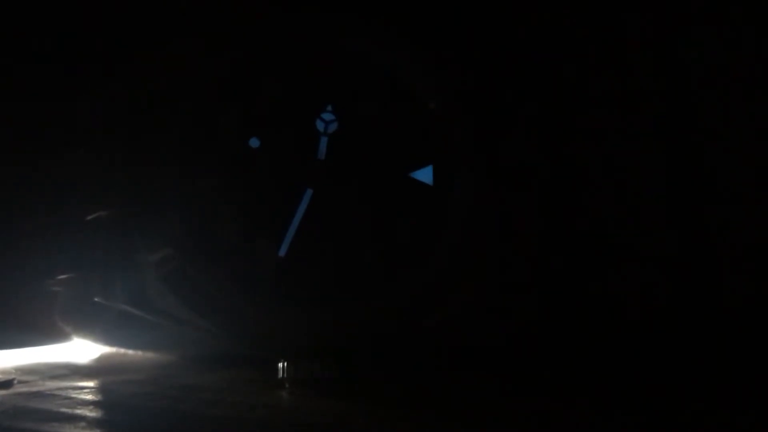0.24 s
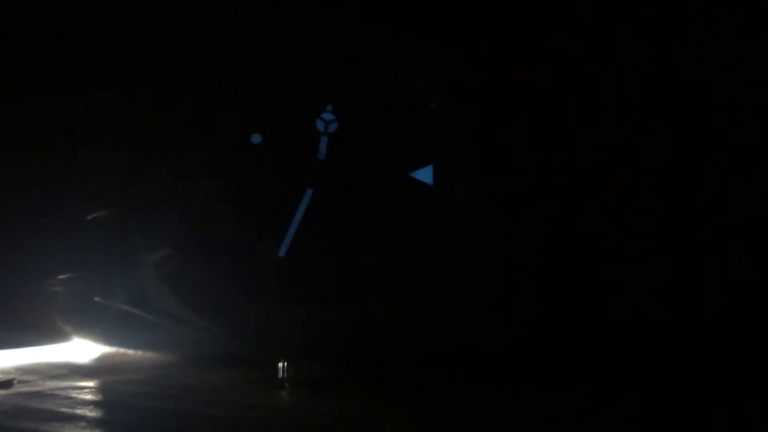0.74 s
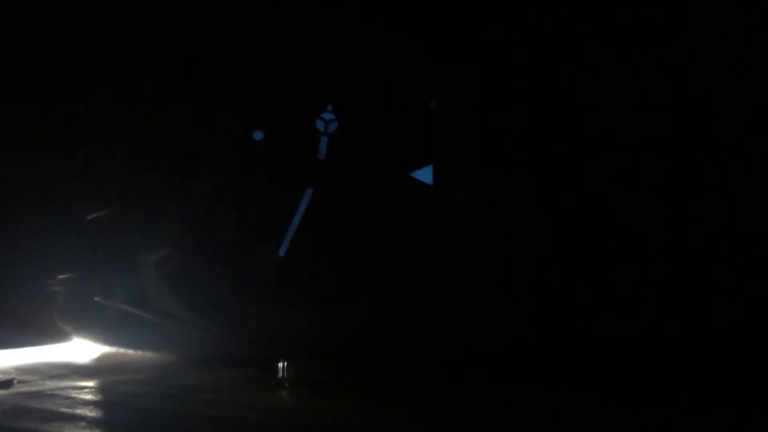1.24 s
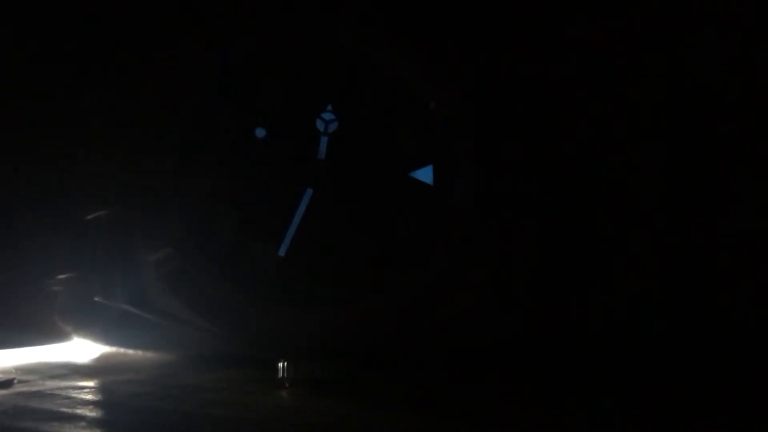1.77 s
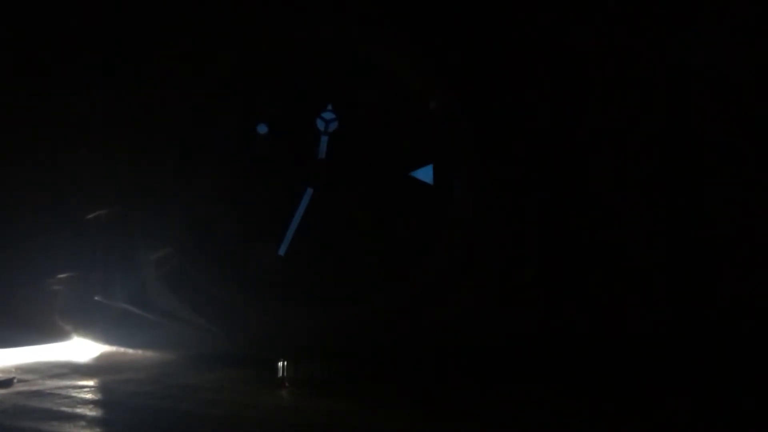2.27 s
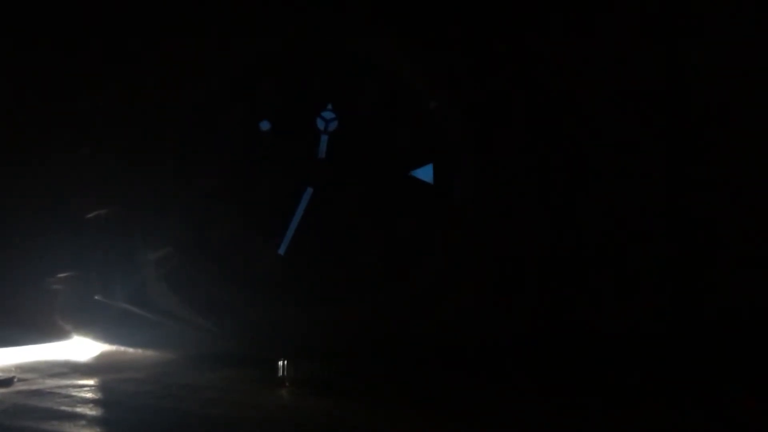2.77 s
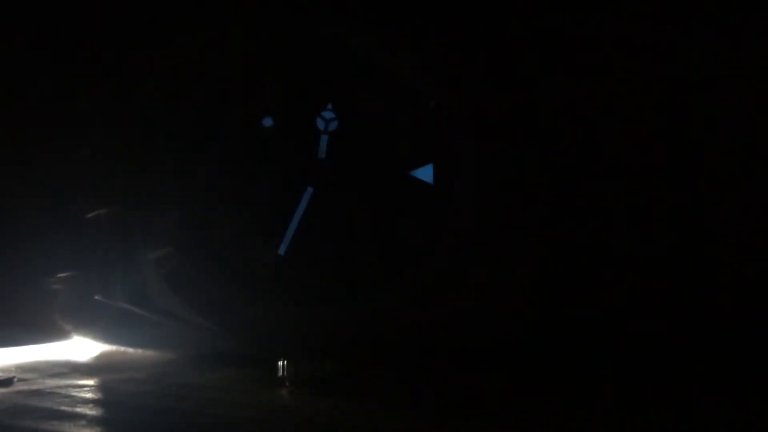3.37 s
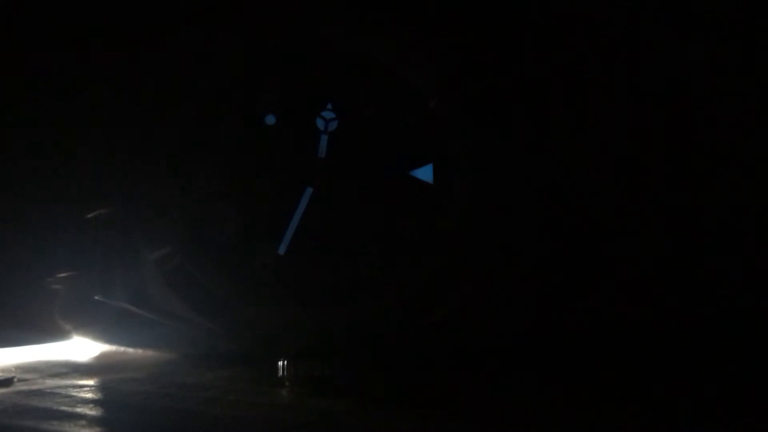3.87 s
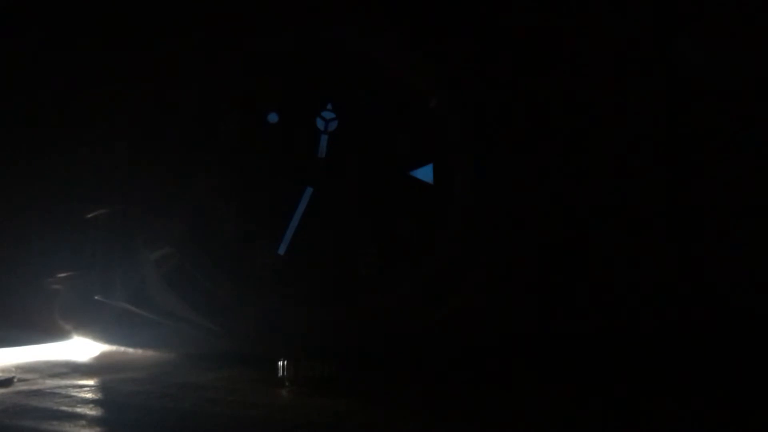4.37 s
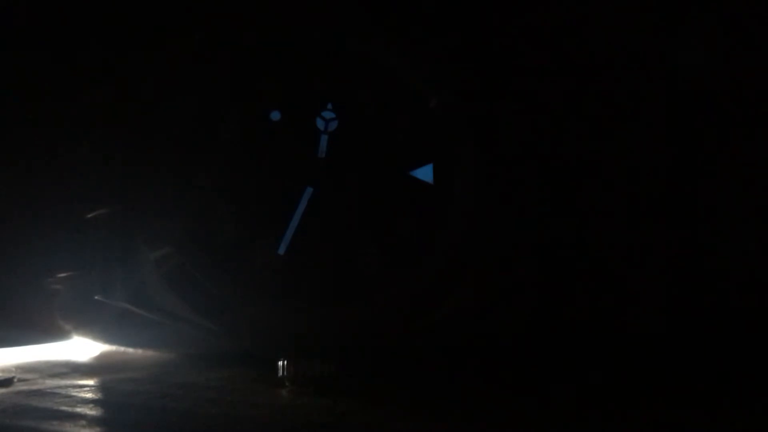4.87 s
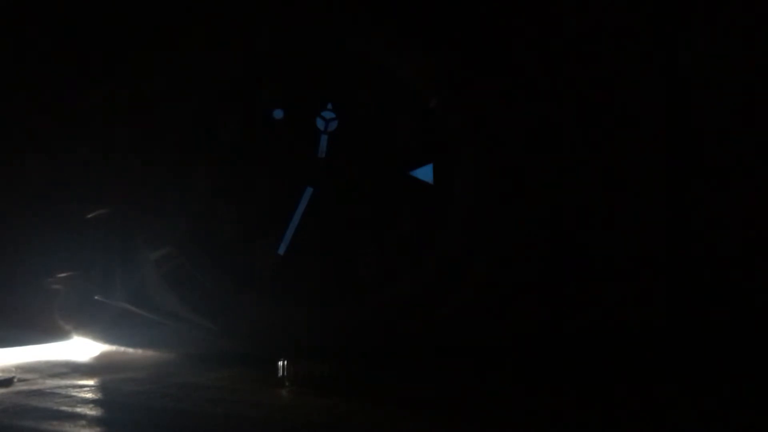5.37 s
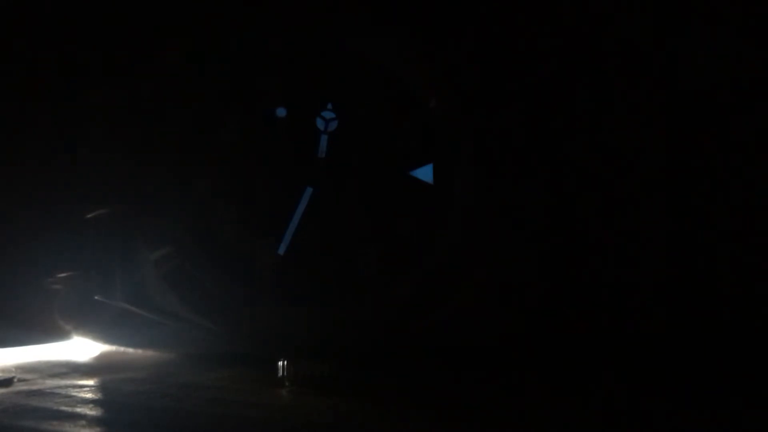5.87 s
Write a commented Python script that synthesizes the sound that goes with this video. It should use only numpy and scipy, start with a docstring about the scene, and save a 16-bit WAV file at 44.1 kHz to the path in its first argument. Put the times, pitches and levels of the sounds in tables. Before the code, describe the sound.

Close handling of a softly ticking mechanical watch: small creaks, dull bumps and a hard triple-catch click over a wavering low machine hum.

```python
"""Wristwatch in the hand

A mechanical watch ticks faintly six times a second, close by: brief contacts ring its small metal parts.
The grip creaks (snap, bright edge, thump) and the hand bumps the body in short low swings.
A finger brushes the casing as ringing, rasping noise, then slips with a sharp click of three quick catches;
a nail ticks thinly. Behind lie a motor hum built from multiples of its throb, a faint bearing and room air."""
import sys
import numpy as np
from scipy import signal
from scipy.fft import rfft, irfft
from scipy.io import wavfile

SR = 44100
rng = np.random.default_rng(int(sys.argv[2]) if len(sys.argv) > 2 else 0)


def dump_mix(stems):
    """Bounce the given channels to the path in sys.argv[1] as a 16-bit WAV at rate SR."""
    frames = np.atleast_2d(stems).T  # one column per channel
    limited = np.clip(frames, -1, 1)  # hard clip at full scale
    pcm = np.round(limited * 32767).astype(np.int16)
    wavfile.write(sys.argv[1], SR, pcm)


N = 270333
TIME = np.arange(N) / SR   # seconds

# Unlocking, impulse and drop in one beat of the escapement.
# Each row: offset from the beat in seconds, level in dB relative to the drop.
BEAT_CONTACTS = [(-.0113, -12), (-.0062, -8), (0, 0)]
FIRST_BEAT_S, BEATS_PER_S = .1556, 6
# Resonances of the watch case. Each row: frequency in Hz, width in Hz, relative level in dB.
WATCH_MODES = [(7330, 190, 3.5), (8600, 660, -8), (11300, 400, 2.5), (12400, 1000, -26), (12400, 620, 2.5),
               (15400, 900, 5.5)]

# Finger strokes on the casing. Each row: start in seconds, attack in seconds, hold in seconds,
# release to -60 dB in seconds, stroke level in dB, rasp in dB relative to the stroke,
# frequency in Hz above which the rasp dulls.
STROKES = [(1.761, 0.095, 0.043, 0.078, -46, 2, 5000), (2.266, 0.018, 0.15, 0.24, -50, 0, 9000),
           (2.308, 0.0097, 0.0069, 0.12, -22.5, -2.5, 18000)]
# Resonances of the casing. Each row: frequency in Hz, width in Hz, relative level in dB.
CASING_MODES = [(179, 31, 1.5), (287, 45, 4), (340, 44, -6.5), (439, 54, -1.5), (573, 22, -3.5),
                (675, 51, 2), (754, 84, -4.5), (822, 45, -5), (995, 50, -21), (1680, 73, -6),
                (1905, 36, -7.5), (2634, 90, -14.5), (2850, 90, -10), (3190, 90, -18.5), (4130, 130, -18),
                (4550, 185, -15.5), (4720, 200, -23), (5020, 80, -20.5), (5970, 150, -40), (8250, 360, -33)]
# Colour of skin rasping on the casing. Each row: frequency in Hz, relative density in dB per Hz.
RASP_COLOUR = [(150, 10.5), (500, 8.5), (1000, 1.5), (2000, -11.5), (3500, -17), (6000, -17.5),
               (10000, -20.5), (16000, -19)]
# In the hardest stroke the finger catches several times in a row, each time harder.
FIRST_CATCH_S, CATCH_GAP_S = 2.3174, .006
CATCH_DB, CATCH_GROWTH_DB = -24, 3.5
# Fingernail ticks on the casing. Each row: time in seconds, level of the contact in dB before filtering.
NAIL_TICKS = [(0.2304, -45.5), (1.8291, -41), (4.9854, -48)]

# Creaks of the grip. Each row: time in seconds, snap level in dB before a common trim,
# thump envelope peak in dB, thump pitch in Hz.
CREAKS = [(0.1856, -49, -37.5, 236), (0.4621, -43, -32, 222), (.5328, -43, -34, 214),
          (0.5713, -36, -38.5, 227), (0.606, -36, -32.5, 210), (0.672, -37, -33.5, 192),
          (0.7005, -37.5, -40, 200), (1.243, -37.5, -33, 195), (1.485, -35, -32.5, 160),
          (1.516, -37, -36, 158), (1.718, -33.5, -36.5, 195), (1.7655, -35, -33.5, 174),
          (1.828, -33, -40, 171), (1.883, -32, -35, 165), (3.3389, -41, -36.5, 220),
          (3.5959, -41.5, -36, 228), (3.635, -37, -38, 336), (4.148, -32.5, -36, 319),
          (4.6703, -32, -32.5, 227), (6.0107, -30, -29, 227)]
# Resonances of a snap. Each row: multiple of the snap's pitch, width in Hz, relative level in dB.
SNAP_MODES = [(.52, 595, -8.5), (.84, 280, 0.5), (1, 198, 4), (1.8, 494, -7.5), (2.4, 700, -10.5)]
SNAP_HZ = 1763   # central pitch of the snaps
# A creak listed at CREAK_DB has an edge at EDGE_DB; harder creaks are much brighter.
CREAK_DB, EDGE_DB = -37.5, -64.5
EDGE_GROWTH = 2.4   # dB of edge per dB of snap
# Dull knock of the body. Each row: frequency in Hz, width in Hz, relative level in dB.
KNOCK_MODES = [(205, 50, 0), (335, 50, -2), (560, 160, -15)]

# Soft bumps of the hand. Each row: time in seconds, envelope peak in dB, pitch in Hz.
BUMPS = [(.396, -35, 208), (1.145, -36.5, 220), (2.104, -34, 200), (2.297, -26.5, 158),
         (2.3487, -17, 182.5), (2.772, -34, 240), (3.024, -37.5, 233), (3.178, -33.5, 232),
         (4.574, -34, 231), (4.986, -31.5, 333), (5.2869, -24.5, 128)]
# Fainter bumps at chance times as the hand fidgets; pitch varies about FIDGET_HZ.
FIDGETS_PER_S, FIDGET_DB, FIDGET_HZ = .7, -39, 228

# Partials of the motor hum. Each row: multiple of the throb rate, relative level in dB before wavering.
HUM_PARTIALS = [(3, -14), (6, -7), (7, -0.5), (8, -7.5), (9, -38), (10, -30), (11, -28), (13, -31)]
# Throb of the motor. Each row: time in seconds, rate in pulses per second.
THROB_RATE = [(0, 17.5), (1.1, 17.62), (1.8, 17.43), (2.25, 17.68), (2.8, 17.38), (3.25, 17.38),
              (4.1, 18.08), (4.7, 17.38), (5.4, 18.07), (6.13, 17.55)]
# Swell of the hum. Each row: time in seconds, level in dB before a small trim.
HUM_LEVEL = [(0, -54), (.65, -44), (1.5, -47), (1.97, -52.5), (2.2, -43), (2.55, -51), (3.05, -47),
             (3.35, -44), (4.15, -40.5), (4.65, -51.5), (4.9, -45), (5.4, -41), (6.13, -46.5)]
# Singing of a dry bearing. Each row: frequency in Hz, width in Hz, relative level in dB.
BEARING_MODES = [(749, 32, -10.5), (1136, 18, 6.5), (1291, 47, -3.5), (1680, 135, -10.5)]
BEARING_TURNS_PER_S, FIRST_RUB_S = 5.831, .156

# Tones in the room. Each row: frequency in Hz before wander, rms level in dB before wavering,
# spread of the wavering in dB.
ROOM_TONES = [(44.3, -61.5, 6), (70.66, -52, 2.5), (232.8, -64.5, 5), (254.6, -61.5, 2),
              (728.6, -70.5, 0.5)]
# Colour of the room air. Each row: frequency in Hz, relative density in dB per Hz.
AIR_COLOUR = [(33, -12), (46, 1.5), (90, 1), (170, 2), (290, -12), (360, -9), (470, -15), (700, -18.5),
              (1300, -21), (1420, -26.5), (1850, -25.5), (2450, -34.5), (3200, -33), (4300, -35)]
# Colour of the thin hiss. Each row: frequency in Hz, relative density in dB per Hz.
HISS_COLOUR = [(4500, 1.5), (6300, 5), (7600, -1), (8400, 2.5), (9700, 0.5), (10400, -4), (11200, -2),
               (12400, 3.5), (14000, -1), (16000, 3)]
AIR_DB, HISS_DB = -46, -76   # rms

MIC_LOW_CUT_HZ, CUTOFF_HZ = 28, 15900


def watch(level_db=-60, tock_lag_s=.001, tock_db=0.5, uneven_db=1.6, decay_s=0.0016):
    """Three contacts a beat ring the case; every other beat comes a touch late and is set louder."""
    beat = np.arange(int(N / SR * BEATS_PER_S))
    is_tock = beat % 2
    times = FIRST_BEAT_S + beat / BEATS_PER_S + tock_lag_s * is_tock
    offset, contact_db = np.transpose(BEAT_CONTACTS)
    unevenness = uneven_db * rng.standard_normal((len(beat), 1))
    levels = level_db + contact_db + tock_db * is_tock[:, None] + unevenness
    contacts = bursts((times[:, None] + offset).ravel(), levels.ravel(), decay_s)
    return resonate(contacts, WATCH_MODES)


def slide(start, attack, hold, release, level_db, rasp_db, dull_hz, grain_db=3.0):
    """Skin sticks and slips: uneven friction rasps and sets the casing ringing."""
    t = TIME - start
    rise = np.clip(t / attack, 0, 1)
    fall = 1000.0 ** (-np.clip((t - attack - hold) / release, 0, 2))
    grain = rms_one(from_db(grain_db * np.clip(drift(190), -2, 2)))
    force = rise * fall * grain
    ringing = resonate(force * rng.standard_normal(N), CASING_MODES)
    # one-pole low-pass on the rasp
    dull = np.exp(-2 * np.pi * dull_hz / SR)
    rasp = signal.lfilter([1 - dull], [1, -dull], force * noise(RASP_COLOUR))
    return from_db(level_db) * (ringing + from_db(rasp_db) * rasp)


def catches(ring_db=2.0, rasp_db=-19.0, decay_s=0.0019, push_db=-4.5, push_hz=338, push_lag_s=0.00423, count=3):
    """Each catch lets go with a sharp crack that rings through the casing and pushes the body."""
    k = np.arange(count)
    times = FIRST_CATCH_S + CATCH_GAP_S * k
    levels = CATCH_DB + CATCH_GROWTH_DB * k
    cracks = bursts(times, levels, decay_s)
    ringing = from_db(ring_db) * resonate(cracks, CASING_MODES)
    rasp = from_db(rasp_db) * np.abs(cracks) * noise(RASP_COLOUR)
    push_rows = zip(times + push_lag_s, levels + push_db, np.full(count, push_hz))
    return ringing + rasp + thumps(push_rows, rise_s=0.0035, decay_s=0.0069)


def nail(decay_s=.0015, ring_db=-2.5, lowest_hz=2200):
    """The nail touches lightly: a thin, bright tick that wakes only the high modes of the casing."""
    times, levels = np.transpose(NAIL_TICKS)
    high_modes = [mode for mode in CASING_MODES if mode[0] > lowest_hz]
    ring = resonate(bursts(times, levels + ring_db, decay_s), high_modes)
    return bright_edges(times, levels, decay_s) + ring


def grip(knock_db=1.0, edge_s=0.0019, knock_s=0.0042, lag_s=0.00084):
    """A creak is a short snap with a bright edge and a knock, followed by the thump of the whole body."""
    times, snap_db, thump_db, thump_hz = np.transpose(CREAKS)
    edges = bright_edges(times, EDGE_DB + EDGE_GROWTH * (snap_db - CREAK_DB), edge_s)
    body = thumps(zip(times + lag_s, thump_db, thump_hz), rise_s=0.002, decay_s=0.009)
    return snaps() + edges + knocks(times, thump_db + knock_db, knock_s) + body


def snaps(level_db=-5.0, crunch=0.14, decay_s=0.0009, spread_octaves=0.046):
    """Each creak lets go with one slip and a little crunch, ringing briefly at nearly the same pitch."""
    out, t = np.zeros(N), TIME[:SR // 20]
    for start, snap_db, _, _ in CREAKS:
        hz = SNAP_HZ * 2 ** (spread_octaves * rng.standard_normal())
        force = crunch * rng.standard_normal(len(t)) * np.exp(-t / decay_s)
        force[SR // 1000] += 1   # the slip, 1 ms into the crunch
        # skin cushions the contact, so little is excited far above the pitch
        cushion = signal.butter(2, 1.5 * hz, fs=SR, output="sos")
        modes = [(ratio * hz, width, mode_db) for ratio, width, mode_db in SNAP_MODES]
        ring = resonate(signal.sosfilt(cushion, force), modes)
        add(out, start, from_db(snap_db + level_db) * ring / np.abs(ring).max())
    return out


def hand(knock_db=-7.0, knock_s=0.006, spread_octaves=.15):
    """The hand bumps the body with a dull knock, and fidgets faintly at chance times."""
    times, levels, _ = np.transpose(BUMPS)
    chance = rng.uniform(-1, 1, (round(FIDGETS_PER_S * N / SR), 2))
    fidgets = [(TIME[-1] * (1 + when) / 2, FIDGET_DB, FIDGET_HZ * 2 ** (spread_octaves * pitch))
               for when, pitch in chance]
    pushes = thumps(list(BUMPS) + fidgets, rise_s=0.0027, decay_s=0.0062)
    return knocks(times, levels + knock_db, knock_s) + pushes


def motor(waver_db=1.5, level_db=0.37, smear=0.58):
    """Neighbouring multiples of the throb rate swell roughly in step and beat into a low flutter."""
    angle = 2 * np.pi * (np.cumsum(in_time(THROB_RATE)) / SR + rng.random())
    hum = 0
    for order, db in HUM_PARTIALS:
        phase = smear * rng.uniform(-0.87, 1)   # radians
        hum = hum + from_db(db + waver_db * drift(2.5)) * np.sin(round(order) * angle + phase)
    return np.sqrt(2) * from_db(in_time(HUM_LEVEL) + level_db) * hum


def bearing(level_db=-66.5, rub_db=4.5):
    """Once a turn the bearing rubs a little harder; the friction noise makes it sing faintly."""
    turn = np.cos(2 * np.pi * BEARING_TURNS_PER_S * (TIME - FIRST_RUB_S))
    friction = rms_one(from_db(rub_db * turn)) * rng.standard_normal(N)
    return from_db(level_db) * resonate(friction, BEARING_MODES)


def room(wander=0.002):
    """Moving air, thin hiss and a few faint tones that waver in pitch and level."""
    out = from_db(AIR_DB) * noise(AIR_COLOUR) + from_db(HISS_DB) * noise(HISS_COLOUR)
    for hz, db, waver_db in ROOM_TONES:
        angle = 2 * np.pi * np.cumsum(hz * (1 + wander * drift(5.3))) / SR
        out = out + np.sqrt(2) * from_db(db + waver_db * drift(2.8)) * np.sin(angle)
    return out


def bursts(times, levels_db, decay_s):
    """Brief contacts: each starts at once and dies away as a tiny crunch of random signs."""
    starts = np.zeros(N)
    at = np.clip(np.round(np.asarray(times) * SR).astype(int), 0, N - 1)
    starts[at] = from_db(levels_db)
    envelope = signal.lfilter([1], [1, -np.exp(-1 / (decay_s * SR))], starts + 1e-18)
    return envelope * rng.choice([-1, 1], N)


def thumps(rows, rise_s, decay_s):
    """Cushioned pushes, each a short swing; rows hold seconds, envelope peak in dB and Hz."""
    out, t = np.zeros(N), TIME[:SR // 10]
    envelope = (1 - np.exp(-t / rise_s)) * np.exp(-t / decay_s)
    envelope = envelope / envelope.max()
    for start, db, hz in rows:
        add(out, start, -from_db(db) * envelope * np.sin(2 * np.pi * hz * t))
    return out


def knocks(times, levels_db, decay_s, dull_hz=1100):
    """Skin cushions a knock on the body, so it has little treble."""
    cushion = signal.butter(2, dull_hz, fs=SR, output="sos")
    return signal.sosfilt(cushion, resonate(bursts(times, levels_db, decay_s), KNOCK_MODES))


def bright_edges(times, levels_db, decay_s, low_hz=2700, high_hz=12500):
    """The treble crack of a contact: its crunch through a gentle band-pass."""
    band = signal.butter(1, [low_hz, high_hz], "band", fs=SR, output="sos")
    return signal.sosfilt(band, bursts(times, levels_db, decay_s))


def resonate(force, modes):
    """Parallel resonances, scaled so that white noise roughly keeps its power."""
    out, power = 0, 0
    for k, (hz, width, db) in enumerate(modes):
        r = np.exp(-np.pi * width / SR)
        poles = [1, -2 * r * np.cos(2 * np.pi * hz / SR), r * r]
        scale = (1 - r * r) / 2
        ring = signal.lfilter([1, 0, -1], poles, force + 1e-18)
        out = out + (-1) ** k * from_db(db) * scale * ring   # neighbours have opposite signs
        power += from_db(db) ** 2 * scale
    return out / np.sqrt(power)


def noise(spectrum):
    """Steady noise of the given colour, falling away beyond its ends; rms 1."""
    hz, db = np.transpose(spectrum)
    f = np.maximum(np.arange(N // 2 + 1) * SR / N, 1)
    skirts = 1 / (1 + (hz[0] / f) ** 16 + (f / hz[-1]) ** 16)
    gain = from_db(np.interp(np.log(f), np.log(hz), db)) * np.sqrt(skirts)
    return rms_one(irfft(rfft(rng.standard_normal(N)) * gain, N))


def drift(rate):
    """Random wandering of about the given rate in Hz, scaled to rms 1."""
    # drawn once every 100 samples, after a run-in of 1000 values
    r = np.exp(-200 * np.pi * rate / SR)
    white = rng.standard_normal(N // 100 + 1002)
    slow = signal.lfilter([1], [1, -2 * r, r * r], white)[1000:]
    return np.interp(np.arange(N) / 100, np.arange(len(slow)), rms_one(slow))


def in_time(rows):
    """Straight lines between (seconds, value) rows, sample by sample."""
    return np.interp(TIME, *np.transpose(rows))


def from_db(db):
    """Decibels to gain."""
    return 10 ** (np.asarray(db) / 20)


def rms_one(x):
    """Scale to unit power."""
    return x / np.sqrt(np.mean(x ** 2) + 1e-20)


def add(out, start_s, sound):
    """Mix a sound in at the given second."""
    at = round(start_s * SR)
    out[at:at + len(sound)] += sound[:N - at]


def scene():
    """Watch and hand close by, the hum and the room behind them."""
    finger = sum(slide(*stroke) for stroke in STROKES) + catches() + nail()
    close = watch() + finger + grip() + hand()
    behind = motor() + bearing() + room()
    return (close + behind)[None, :]


def record(dry):
    """The small microphone loses the deepest bass; the top is cut steeply."""
    low_cut = signal.butter(2, MIC_LOW_CUT_HZ, "high", fs=SR, output="sos")
    top_cut = signal.ellip(12, .1, 80, CUTOFF_HZ, fs=SR, output="sos")
    return signal.sosfilt(top_cut, signal.sosfilt(low_cut, dry))


dry = scene()
out = record(dry)
dump_mix(out)
```